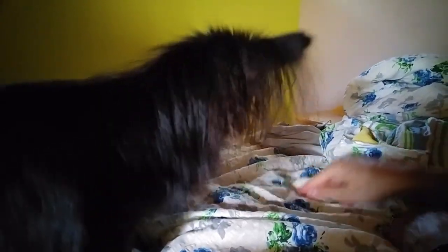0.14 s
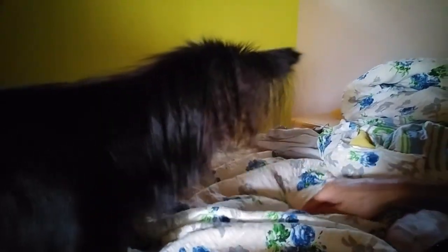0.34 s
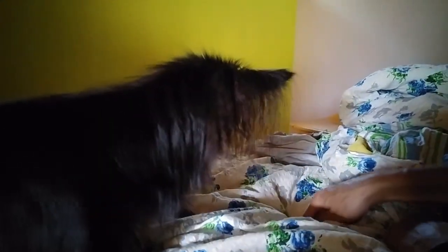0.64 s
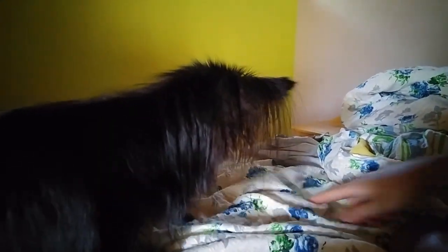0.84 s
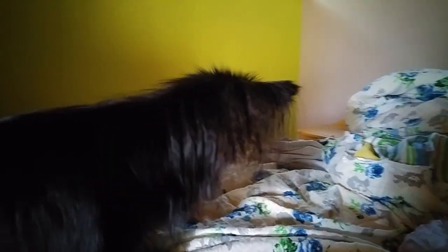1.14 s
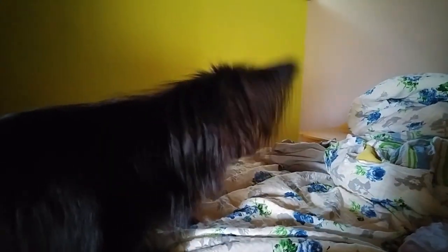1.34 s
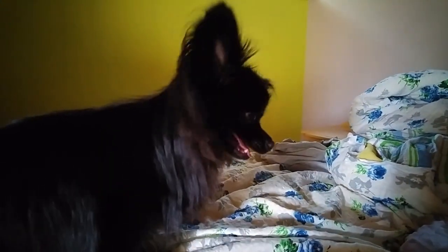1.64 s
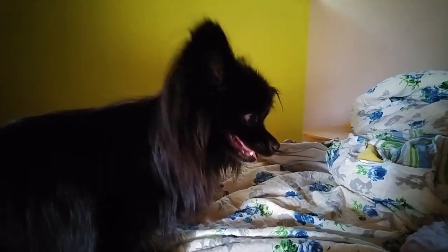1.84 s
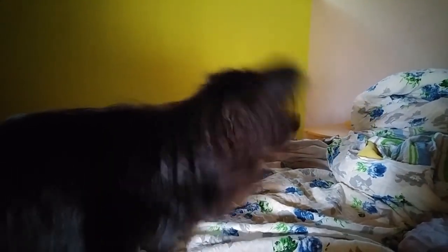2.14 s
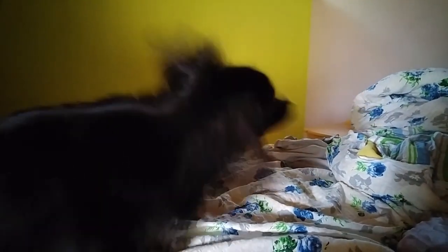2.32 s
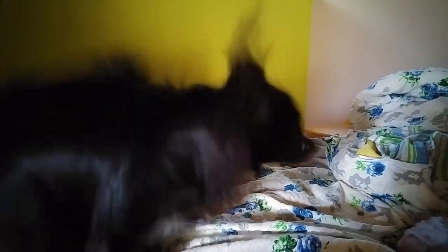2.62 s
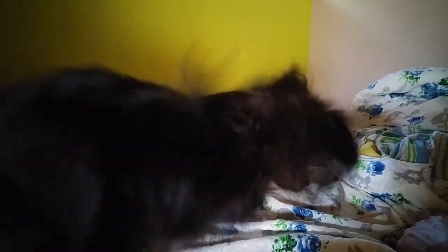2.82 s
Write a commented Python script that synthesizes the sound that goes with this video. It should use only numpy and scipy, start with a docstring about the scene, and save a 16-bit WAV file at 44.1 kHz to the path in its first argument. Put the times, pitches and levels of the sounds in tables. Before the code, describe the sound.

High whining from a small dog on a bed, heard close by in a small, slightly echoing room. A short arching squeal leads into a softer, drawn-out whine, with soft paw thumps and rustling bedding towards the end.

```python
"""Small dog whining on a bed

A small, quiet bedroom, stereo microphone about a metre from the dog. A loud arching squeal, then one
long, thin, slowly sinking whine: nearly pure harmonics, shaped by the throat, that beat against the
echoes of the room. Towards the end the dog scrambles over the duvet: soft paw thumps, rustling cloth."""
import sys
import numpy as np
from scipy import signal
from scipy.fft import rfft, irfft, next_fast_len
from scipy.io import wavfile
from scipy.ndimage import uniform_filter1d, minimum_filter1d, map_coordinates

SR = 44100
rng = np.random.default_rng(int(sys.argv[2]) if len(sys.argv) > 2 else 0)


def put_to_file(sound):
    """Save the sound as 16-bit audio at rate SR, in the file named by the first command-line argument."""
    columns = np.atleast_2d(sound).T  # one column per channel
    safe = np.clip(columns, -1, 1)
    whole_steps = np.round(safe * 32767)
    wavfile.write(sys.argv[1], SR, whole_steps.astype(np.int16))


N = 132300

# spectrum of the room tone: freq_hz, density_db
ROOM_TONE_SPECTRUM = [(20,-33),(40,-15.5),(60,3),(130,-7.5),(300,-8),(420,-4),(560,-11.5),(750,-5.5),(1300,-15.5),(3000,-28),(7000,-20.5),(16000,-29)]
# melody of each cry: time_s, pitch_hz
SQUEAL_PITCH = [(0.232, 1169), (0.284, 1460), (0.322, 1810), (0.37, 1812), (0.406, 1919), (0.456, 2132),
                (0.464, 2404), (0.53, 2589), (0.57, 2545), (0.6, 2345), (0.61, 2102), (0.636, 1779),
                (0.704, 1769), (0.716, 1559), (0.742, 1410), (0.754, 1329), (0.772, 979), (0.775, 960)]
WHINE_PITCH = [(0.83, 1124), (0.88, 1286), (0.9, 1317), (0.95, 1237), (1.0, 1199), (1.1, 1162),
               (1.34, 1119), (1.73, 1107), (2.03, 1082), (2.25, 1073), (2.38, 1086), (2.43, 1173),
               (2.51, 1117), (2.65, 1082), (2.99, 1042)]
# effort of each cry, ahead of the throat: time_s, level_db
SQUEAL_LEVEL = [(.232,-19),(.29,-13.5),(.36,-12.5),(.42,-13.5),(.48,-12),(.53,-19.5),(.6,-15),(.64,-22),(0.719,-25.5),(.755,-30.5),(0.774,-40.5)]
WHINE_LEVEL = [(.833,-26.5),(0.898,-20.5),(1.201,-21),(1.651,-22),(1.999,-26),(2.35,-26.5),(2.44,-20),(2.56,-24.5),(2.75,-28.5),(3,-33.5)]
# resonances of throat and muzzle: freq_hz, gain_db
SQUEAL_FORMANTS = [(1000,-12),(1900,-9.5),(2700,-12.5),(3600,-11),(4500,-2.5),(5400,-3),(6200,-9.5),(7500,-12),(9000,-21),(11000,-22.5),(13000,-31.5),(16000,-62)]
WHINE_FORMANTS = [(1100,-10),(2200,-12.5),(3250,-17.5),(3800,-8),(4500,-3.5),(5450,-13.5),(6500,-28),(7700,-41),(8800,-30),(10000,-29),(11100,-20),(12200,-33.5),(13500,-45.5),(16000,-58)]
# air hissing in the squeal: freq_hz, density_db
BREATH_SPECTRUM = [(700,-13),(1500,-16),(3000,-9),(4500,-2.5),(7000,-17),(10000,-22.5),(15000,-29)]
# direct sound at the microphone: freq_hz, left_minus_right_db
DIRECT_BALANCE = [(1100, -8.5), (2200, -2.5), (3300, 8), (4500, 10.5), (7000, 7.5), (12000, -3.5)]
# colour of the room's answer: freq_hz, gain_db
REVERB_COLOUR = [(200,-11),(1100,-8),(2300,-6),(4500,-2.5),(8000,0.5),(15000,-4)]
# echoes off the nearest walls, relative to the tail: delay_s, left_db, right_db
WALL_ECHOES = [(.0058,-21,-25.5),(.0094,-20,-11.5),(.0147,-5.5,-3)]
# paws landing on the bed: start_s, pitch_hz, thump_db, scuff_db
PAW_LANDINGS = [(2.422,302,-37,-40),(2.459,80.2,-38,-44),(2.526,227,-51,-52),(2.583,65.5,-41,-37),(2.629,65.5,-36.5,-39.5),(2.703,224.6,-44,-42),(2.738,61.7,-42,-48),(2.762,75.6,-36.5,-41),(2.84,69,-38.5,-66),(2.967,57,-42,-45)]
# spectrum of the rubbing duvet: freq_hz, density_db
DUVET_SPECTRUM = [(60, 3.5), (200, 1), (350, 0.5), (520, -8), (800, -0.5), (1500, -12.5), (3000, -26.5),
                  (8000, -36), (16000, -42)]
# microphone side tones, relative to their partial: partial_hz, level_db
SIDE_TONE_LEVELS = [(1100,-66),(2200,-46.5),(4500,-33.5),(5600,-31.5),(8000,-38.5),(11000,-15.5)]

TOP_HZ = 15800


def undb(db):
    """Decibels to gain."""
    return 10 ** (np.asarray(db) / 20)


def on_curve(hz, points):
    """Read (freq_hz, gain_db) points on a log-frequency axis."""
    freqs, db = np.array(points, float).T
    return np.interp(np.log(np.maximum(hz, 1)), np.log(freqs), db)


def colour(x, points):
    """Filter by (freq_hz, gain_db) points."""
    size = next_fast_len(N + SR // 10)
    gain = undb(on_curve(np.fft.rfftfreq(size, 1 / SR), points))
    return irfft(rfft(x, size) * gain, size)[..., :N]


def noise(points, width=0.):
    """Coloured stereo noise, rms 1; width sets how unlike the channels are."""
    mid, side = colour(rng.standard_normal((2, N)), points)
    x = np.array([mid + width * side, mid - width * side])
    return x / x.std()


def wander(rate_hz):
    """Smooth random drift with spread 1."""
    span = max(int(SR / rate_hz), 2)
    steps = np.repeat(rng.standard_normal(N // span + 1), span)
    x = uniform_filter1d(uniform_filter1d(steps, span), span)[:N]
    return x / x.std()


def room_tone():
    """The quiet bedroom: faint, low noise whose level wavers a little."""
    return undb(-62.5 + 1.2 * wander(7.45)) * noise(ROOM_TONE_SPECTRUM, width=0.7)


def cry(t, melody, effort, throat, glide_s, bloom_s, waver, jitter, shimmer_db,
        attack_s=.0028, release_s=.034):
    """Harmonics of one trembling pitch, weighted by the throat; the higher ones bloom later."""
    times, hz = np.array(melody, float).T
    pitch = uniform_filter1d(np.interp(t, times, hz), int(glide_s * SR))
    pitch *= 1 + waver * wander(44.92) + jitter * wander(900)
    gate = np.clip((t - times[0]) / attack_s + 1, 0, 1) * np.clip((times[-1] - t) / release_s + 1, 0, 1)
    voiced = gate > 0
    pitch = pitch[voiced]
    phase = 2 * np.pi * np.cumsum(pitch) / SR
    age = np.arange(len(pitch)) / SR
    tone = np.zeros(N)
    for k in range(1, 15):
        gain = undb(on_curve(k * pitch, throat)) * (k * pitch < TOP_HZ)
        bloom = np.minimum(age / (bloom_s * k ** 2), 1)
        tone[voiced] += gain * bloom * np.sin(k * phase)
    level_db = np.interp(t, *np.array(effort).T) + shimmer_db * wander(120)
    return gate * undb(level_db) * np.sqrt(2) * tone


def squeal(t, breath_db=-28):
    """The loud, arching cry, with a hiss of air that follows its level."""
    tone = cry(t, SQUEAL_PITCH, SQUEAL_LEVEL, SQUEAL_FORMANTS,
               glide_s=.0022, bloom_s=.0001, waver=.00202, jitter=.0013, shimmer_db=1.5)
    envelope = uniform_filter1d(np.abs(tone), size=200)
    return tone + undb(breath_db) * envelope * noise(BREATH_SPECTRUM)[0]


def direct_path(voice, left_lag_s=.00003):
    """Muzzle to microphone: each side has its own colour, and the left arrives a touch late."""
    left = colour(voice, [(hz, db / 2) for hz, db in DIRECT_BALANCE])
    right = colour(voice, [(hz, -db / 2) for hz, db in DIRECT_BALANCE])
    return np.array([map_coordinates(left, [np.arange(N) - left_lag_s * SR]), right])


def bedroom_echoes(t, voice, gap_s=.0033, low_t60_s=.29, treble_t60_s=.24):
    """Wall echoes and a dense tail, different on each side of the microphone; treble dies sooner."""
    age = np.maximum(t - gap_s, 0)
    response = np.zeros((2, N))
    for band, t60_s in (("low", low_t60_s), ("high", treble_t60_s)):
        crossover = signal.butter(2, 6000, band, fs=SR, output="sos")
        reflections = signal.sosfilt(crossover, rng.standard_normal((2, N)))
        response += (age > 0) * reflections * undb(-60 * age / t60_s)
    response /= np.sqrt(np.sum(response ** 2, axis=1, keepdims=True))
    for delay_s, left_db, right_db in WALL_ECHOES:
        response[:, int(delay_s * SR)] += undb([left_db, right_db])
    return signal.fftconvolve(colour(voice, REVERB_COLOUR)[None], response[:, :SR], axes=1)[:, :N]


def whine(t):
    """The long, thin cry: softer and steadier, slowly sinking in pitch."""
    return cry(t, WHINE_PITCH, WHINE_LEVEL, WHINE_FORMANTS,
               glide_s=.0056, bloom_s=.00091, waver=.00014, jitter=.00014, shimmer_db=.42)


def swell(age, peak_s):
    """Envelope of a soft impact: rises to 1 at peak_s, then dies away."""
    return age / peak_s * np.exp(1 - age / peak_s)


def scramble(t, rustle_db=-49.5):
    """Each paw thumps the mattress and scuffs the duvet, which rustles as the dog moves."""
    thumps, scuffs = np.zeros((2, N))
    for start_s, pitch_hz, thump_db, scuff_db in PAW_LANDINGS:
        age = np.maximum(t - start_s, 0)
        thumps += undb(thump_db) * swell(age, peak_s=.0072) * np.sin(2 * np.pi * pitch_hz * age)
        scuffs += undb(scuff_db) * swell(age, peak_s=.0026)
    movement = np.interp(t, [2.34, 2.42, 2.77, 2.89], [0, .87, 1, .34])
    rustle = undb(rustle_db + 2 * wander(50)) * movement
    return thumps + (scuffs + rustle) * noise(DUVET_SPECTRUM, width=0.27)


def scene():
    """Room tone, the dog heard from a metre away and off the walls, then paws on the bed."""
    t = np.arange(N) / SR
    voice = squeal(t) + whine(t)
    return room_tone() + direct_path(voice) + bedroom_echoes(t, voice) + scramble(t)


def record(dry, limit_db=-1.5, hold_s=.0096, side_offset_hz=3898):
    """A limiter holds down the peaks, the microphone adds faint side tones, and the top is cut."""
    hold = int(hold_s * SR)
    gain = np.minimum(undb(limit_db) / (np.abs(dry).max(axis=0) + 1e-9), 1)
    limited = dry * uniform_filter1d(minimum_filter1d(gain, hold), hold)
    # ring modulation puts one side tone above and one below every partial
    carrier = np.sin(2 * np.pi * side_offset_hz * np.arange(N) / SR)
    side_tones = 2 * colour(limited, SIDE_TONE_LEVELS) * carrier
    top_cut = signal.ellip(10, .2, 80, TOP_HZ, fs=SR, output="sos")
    return signal.sosfilt(top_cut, limited + side_tones)


dry = scene()
out = record(dry)
put_to_file(out)
```